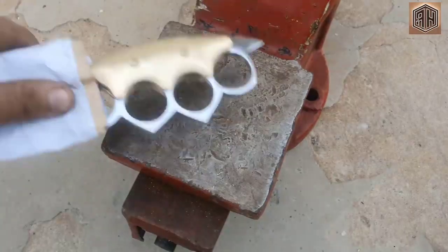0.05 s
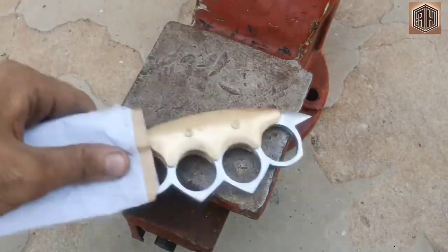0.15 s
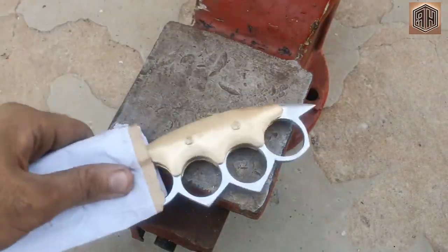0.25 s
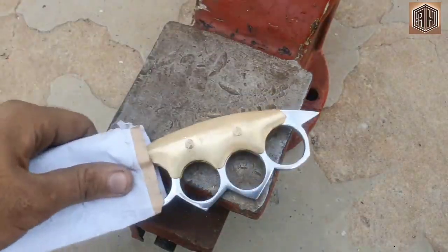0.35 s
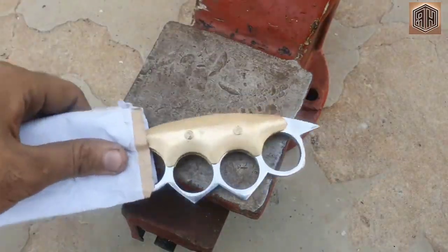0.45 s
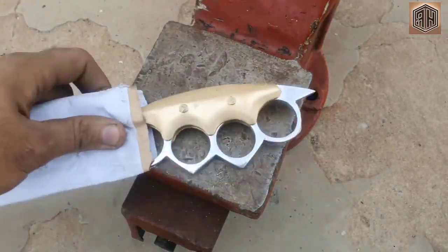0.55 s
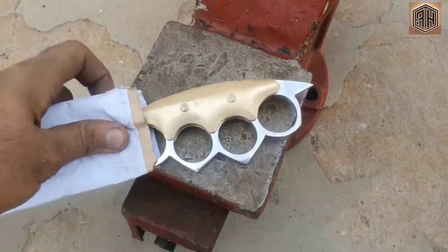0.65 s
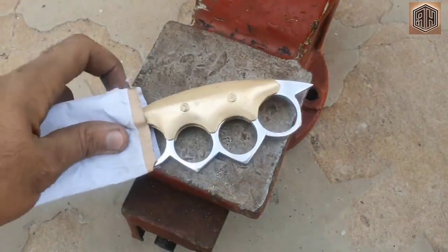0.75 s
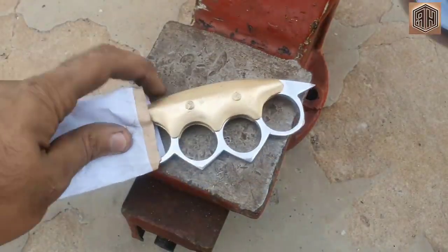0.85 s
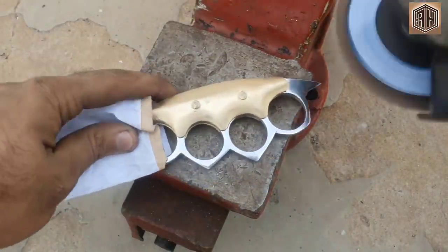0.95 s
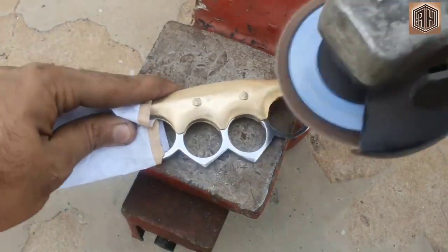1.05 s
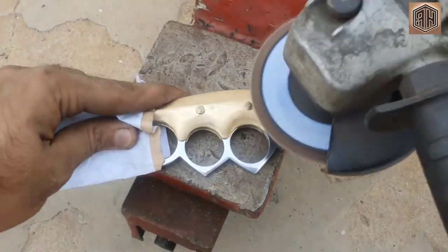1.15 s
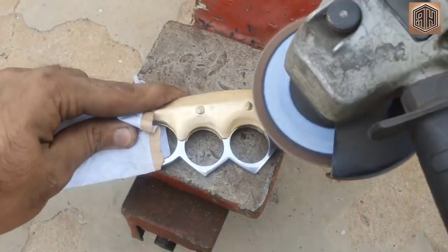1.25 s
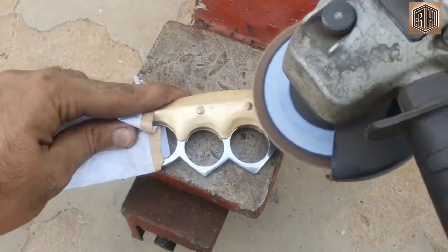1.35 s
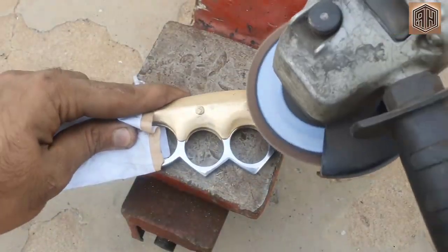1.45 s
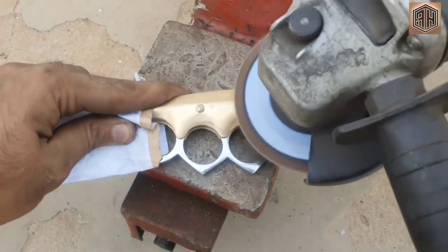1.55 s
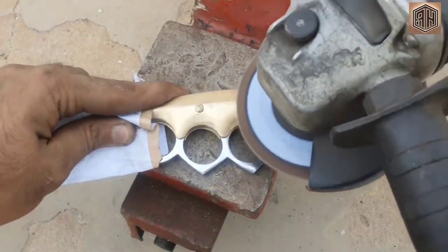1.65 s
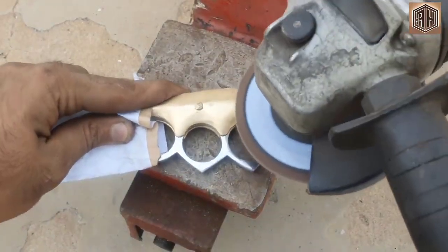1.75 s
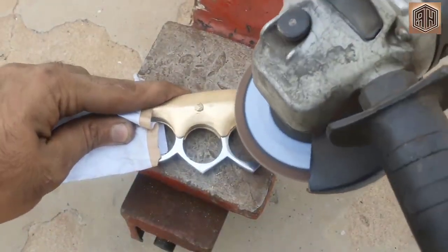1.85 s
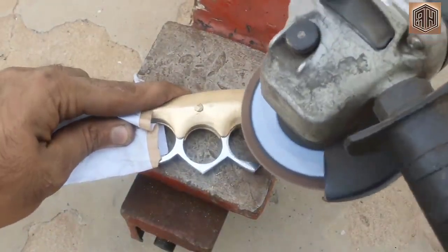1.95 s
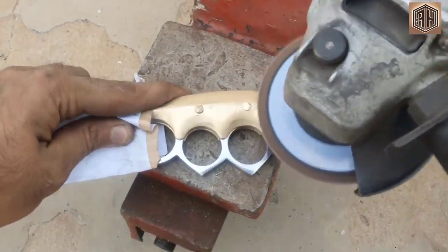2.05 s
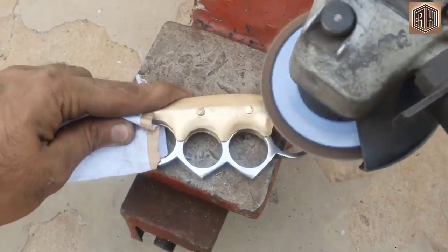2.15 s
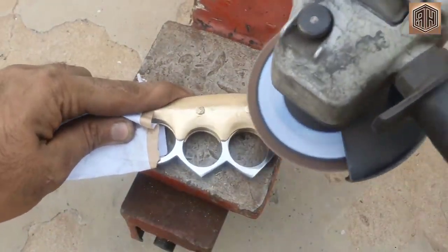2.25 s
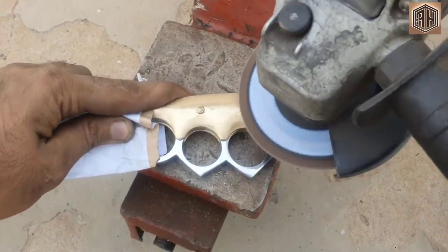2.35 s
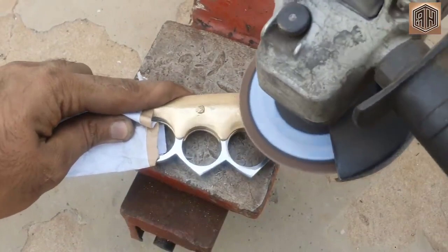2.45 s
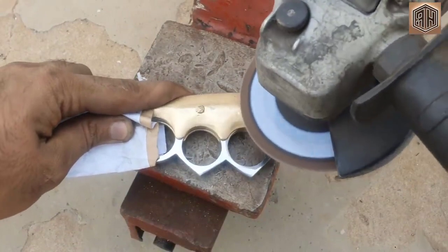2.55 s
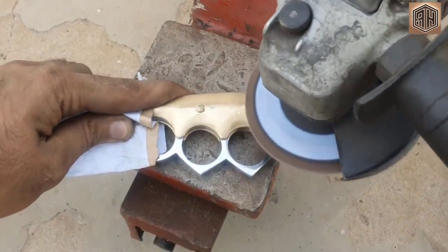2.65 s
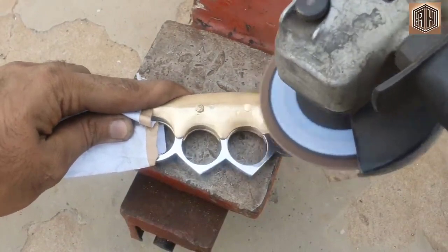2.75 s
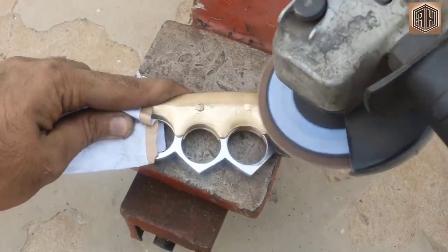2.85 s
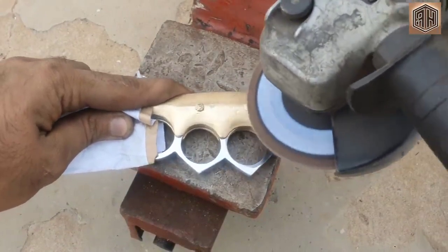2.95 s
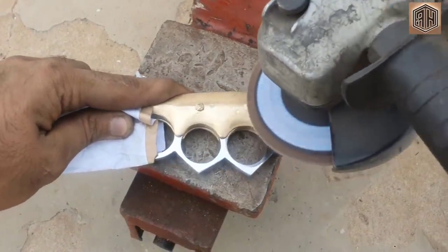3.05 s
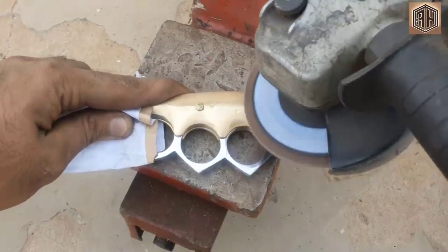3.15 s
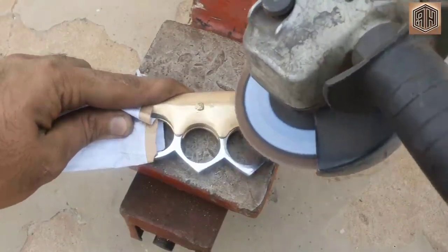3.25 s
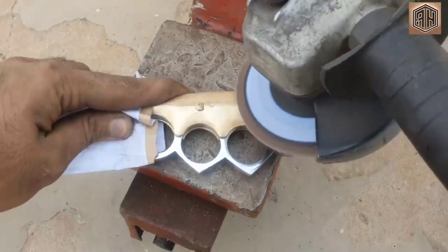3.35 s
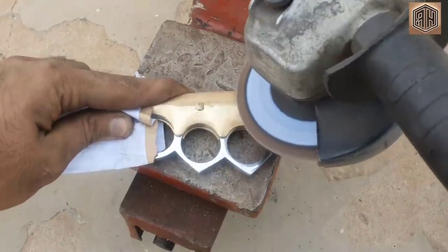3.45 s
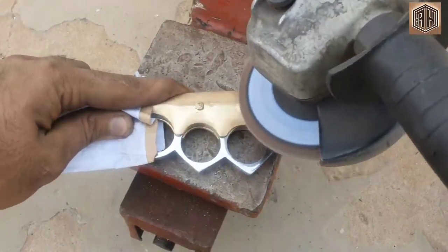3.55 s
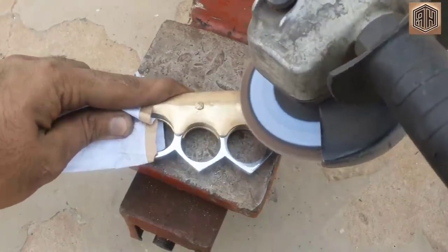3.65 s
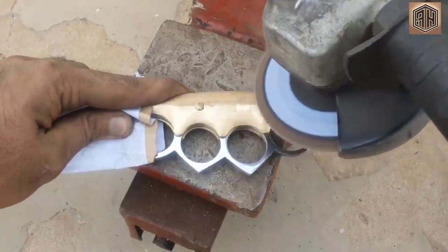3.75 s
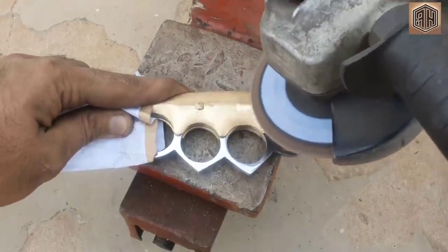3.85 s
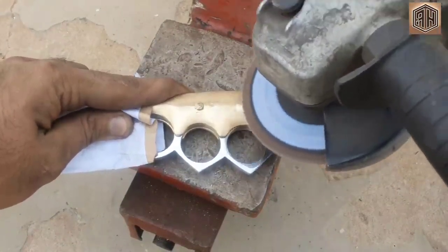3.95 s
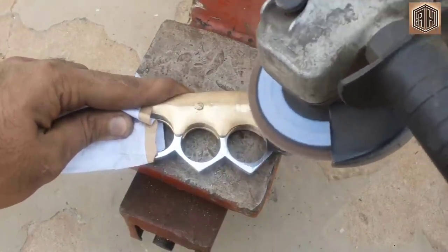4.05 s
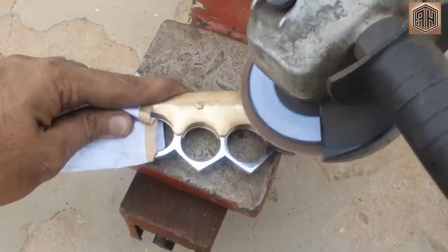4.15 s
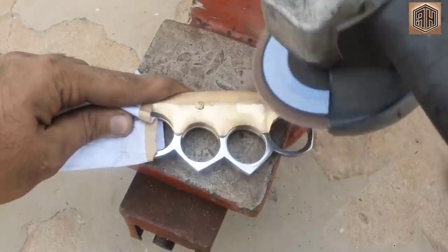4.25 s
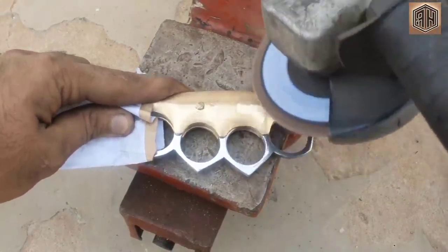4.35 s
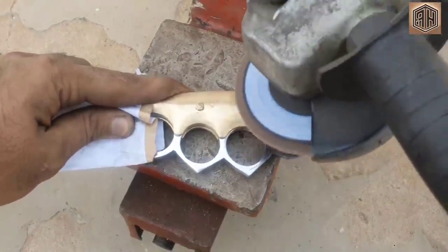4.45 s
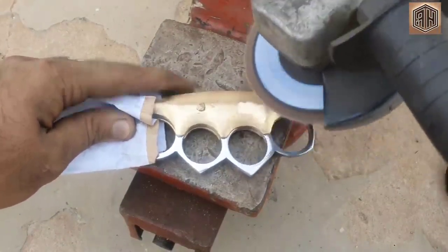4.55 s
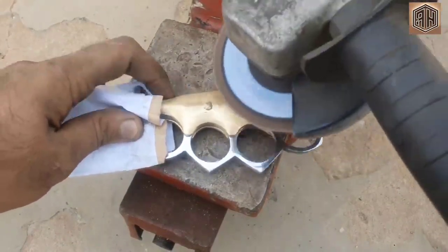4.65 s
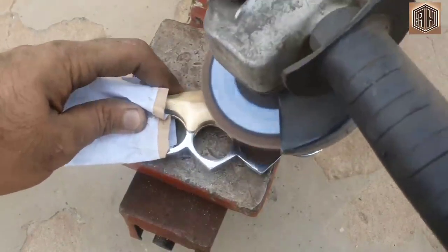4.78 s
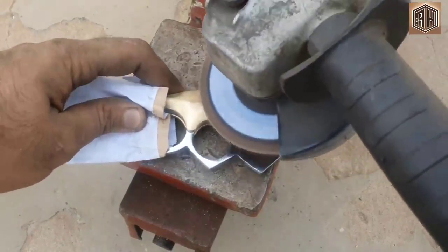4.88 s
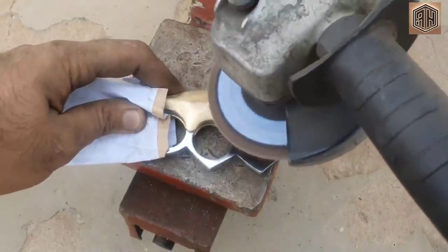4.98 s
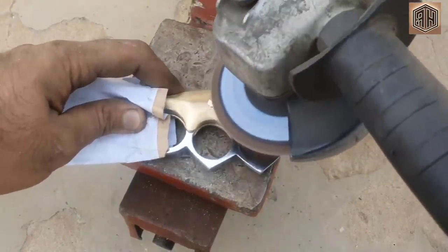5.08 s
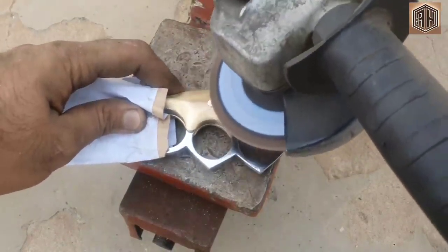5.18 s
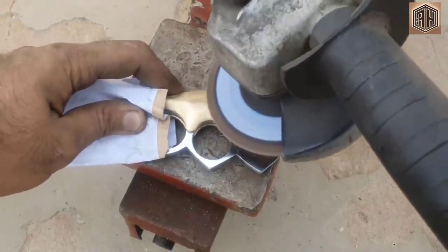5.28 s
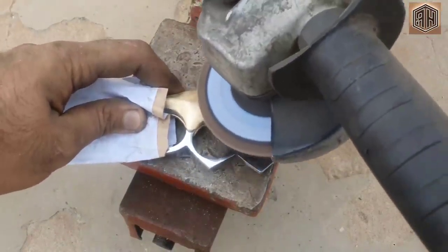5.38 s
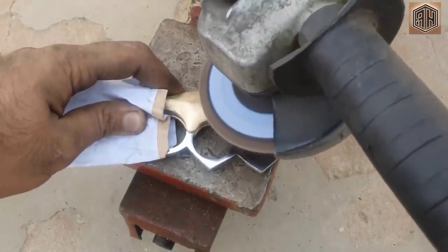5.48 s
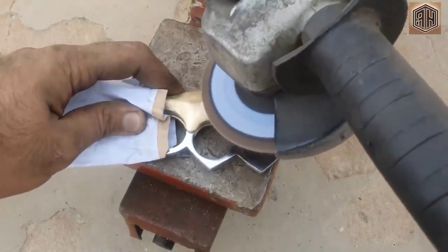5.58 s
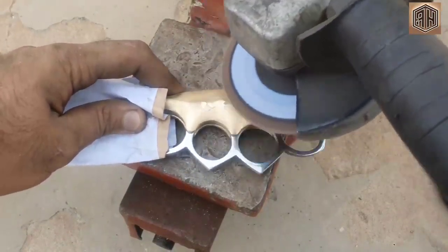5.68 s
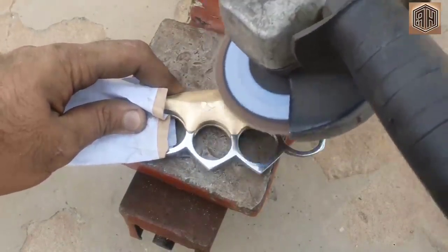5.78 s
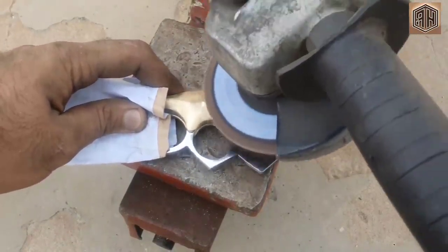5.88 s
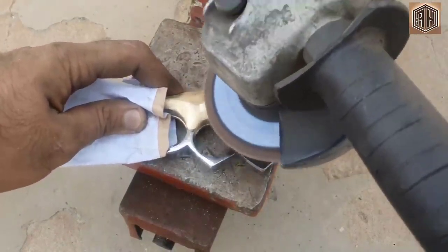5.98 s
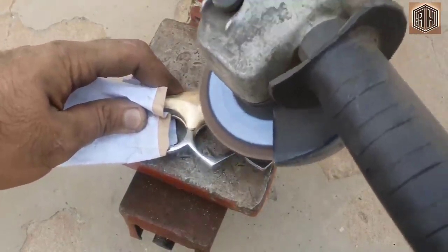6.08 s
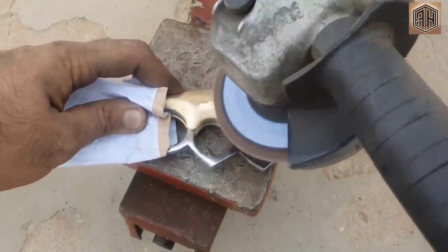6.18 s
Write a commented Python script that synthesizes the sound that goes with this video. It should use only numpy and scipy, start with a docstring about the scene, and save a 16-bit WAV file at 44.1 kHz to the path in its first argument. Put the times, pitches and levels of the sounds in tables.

```python
"""Knife and angle grinder outdoors

A knuckle-guard knife is slid onto a steel block: gritty noise and short ringing ticks.
Then an angle grinder with a polishing disc starts: blows at the pulse of its current ring the housing,
and shaped noise makes its roar. On the metal it slows, whines on shaft orders (sines) and hisses.
A hum of three sines sinks as the tool starts; low noise and decaying sines are air bumping the microphone."""
import sys
import numpy as np
from scipy import signal
from scipy.io import wavfile
from scipy.ndimage import uniform_filter1d

SR = 44100
rng = np.random.default_rng(int(sys.argv[2]) if len(sys.argv) > 2 else 0)


def pcm_store(signal):
    """Save signal as 16-bit PCM."""
    levels = np.round(np.clip(np.atleast_2d(signal), -1, 1) * 32767)
    wavfile.write(sys.argv[1], SR, levels.astype(np.int16).T)


N = 274302  # samples
SWITCH_S = .7445  # the grinder is switched on
PULSE_HZ = 178.3  # pulse of the current, also the pitch of the hum


def amp(db):
    """Decibels to gain."""
    return 10 ** (np.asarray(db) / 20)


def lean(left_db):
    """Gains of the left and right port, left_db apart."""
    return amp(np.array([[.5], [-.5]]) * left_db)


def evened(x):
    """Scales to rms 1."""
    return x / np.sqrt(np.mean(x ** 2) + 1e-20)


def read(points, hz):
    """Reads a table over log frequency."""
    f, value = np.transpose(points)
    return np.interp(np.log(hz + 1), np.log(f + 1), value)


def curves(rows):
    """The columns of a table at every sample."""
    s, *columns = np.transpose(rows)
    return [np.interp(np.arange(N) / SR, s, c) for c in columns]


def while_on(rows):
    """1 from the first to the last row of a table, else 0."""
    t = np.arange(N) / SR
    return (t >= rows[0][0]) & (t <= rows[-1][0])


def drift(per_s):
    """Slow random wander: straight lines between per_s random knots a second."""
    knots = rng.standard_normal(int(N / SR * per_s) + 2)
    return np.interp(np.arange(N) / SR * per_s, np.arange(len(knots)), knots)


def lump(s, rise_s, hold_s, fall_s):
    """Gain that climbs 20 dB in rise_s up to s, holds, and drops 20 dB in fall_s."""
    t = np.arange(N) / SR - s
    return amp(-20 * np.maximum(np.maximum(-t / rise_s, (t - hold_s) / fall_s), 0))


# how alike the two ports hear noise: (frequency [Hz], likeness [0-1])
PORT_LIKENESS = [(60, 0.28), (92, 0.26), (140, 0.6), (210, 0.25), (330, 0.56), (500, 0.87), (770, 0.42),
                 (1170, 0.9), (1790, 0.52), (2740, 0.58), (4190, 0.23), (6410, 0.062), (9810, 0.011),
                 (15000, 0.00017)]
# which port hears noise louder: (frequency [Hz], left minus right [dB])
PORT_LEAN = [(60, 10), (92, 4), (140, 0), (210, 15), (330, 7), (500, -1.5), (770, -3.5), (1170, 1.5),
             (1790, 2), (2740, -3.5), (4190, 0.5), (6410, -1.5), (9810, 0), (15000, 4.5)]


def noise(spectrum, patchy_db, likeness=PORT_LIKENESS, port_lean=PORT_LEAN, size=512):
    """Two-port noise from random short-time spectra with drifting patches; its mid has rms 1."""
    hz = np.fft.rfftfreq(size, 1 / SR)
    a, b, c, d, patches = rng.standard_normal((N * 4 // size + 5, len(hz), 5)).T
    patches = uniform_filter1d(patches, size=6, axis=0)
    patches = evened(uniform_filter1d(patches, size=16, axis=1))
    like = np.clip(read(likeness, hz), -1, 1)[:, None]
    half_lean = amp(read(port_lean, hz) / 2)[:, None]
    left = a + 1j * b
    right = like * left + np.sqrt(1 - like ** 2) * (c + 1j * d)
    ports = np.array([left * half_lean, right / half_lean])
    ports *= amp(read(spectrum, hz)[:, None] + patchy_db * patches)
    out = signal.istft(ports, nperseg=size, noverlap=size * 3 // 4)[1][:, :N]
    return out / np.sqrt(np.mean(out.mean(0) ** 2))


def tone(turns, db, left_db, lag):
    """A sine of wavering level, set midway between the ports; the right port lags by lag radians."""
    ports = lean(left_db) * np.exp(-1j * np.array([[0], [lag]]))
    ports = ports / max(abs(ports.mean()), .5)
    wave = np.exp(2j * np.pi * (turns + rng.random())) * ports
    return np.sqrt(2) * amp(db + 1.2 * drift(15)) * wave.real


def resonate(x, hz, width_hz):
    """Rings x at a gliding pitch: shifts the curve hz down to zero, smooths, and shifts back."""
    turn = np.exp(2j * np.pi * np.cumsum(hz) / SR)
    r = np.exp(-np.pi * width_hz / SR)
    return 2 * (turn * signal.lfilter([1 - r], [1, -r], x / turn)).real


# colour of the scraping: (frequency [Hz], relative density [dB per Hz])
SCRAPE_COLOUR = [(290, -45), (500, -18), (1170, -1), (1880, -7.5), (2240, -3), (2990, -10.5), (3820, -18),
                 (4170, -19), (5480, -17), (6610, -17.5), (15700, -32.5)]
# knife and cloth slide over the block:
# (start [s], hold [s], time to fall 20 dB [s], level [dB], brightness [dB])
SLIDES = [(.105, .04, .08, -35, -1.5), (.17, .022, .015, -40, 1.5), (.222, .01, .035, -39, -1.5),
          (.27, .05, .04, -57, 4), (.328, .003, .02, -40, -16), (.495, .015, .03, -55, 3),
          (.532, .012, .03, -38, 2), (.59, .05, .03, -41, -7), (.66, .018, .045, -36, 5.5),
          (.72, .03, .03, -47, 1.5)]
# the knife ticks on the block: (time [s], level [dB], ring [Hz])
TICKS = [(0.085, -26, 985), (0.179, -28, 1130), (0.215, -13, 2200), (0.236, -18, 2300), (0.297, -22, 5270),
         (0.326, -22, 1340), (0.425, -36, 7240), (0.481, -28, 1040), (0.583, -23, 2370),
         (0.622, -22.5, 1480), (0.659, -22, 5610)]
SLIDE_RISE_S = .025  # time to climb 20 dB
REST_DB, REST_BRIGHT_DB = -68, -.5  # grit between slides
TICK_T60_S = .017


def handling():
    """Gritty sliding as two bands of noise, and small metal ticks as short sines with noise."""
    grit = noise(SCRAPE_COLOUR, 3.2, [(500, 0.25), (15000, 0.1)], [(500, -0.1), (15000, -0.43)], size=256)
    grit = grit * amp(2.0 * drift(300))
    dull = signal.sosfilt(signal.butter(4, 4000, fs=SR, output="sos"), grit)
    bright = signal.sosfilt(signal.butter(4, 4000, "high", fs=SR, output="sos"), grit)
    dull_gain = amp(REST_DB)
    bright_gain = amp(REST_DB + REST_BRIGHT_DB)
    for s, hold_s, fall_s, db, bright_db in SLIDES:
        slide = amp(db) * lump(s, SLIDE_RISE_S, hold_s, fall_s)
        dull_gain = dull_gain + slide
        bright_gain = bright_gain + slide * amp(bright_db)
    out = evened(dull) * dull_gain + evened(bright) * bright_gain
    out *= np.arange(N) < SWITCH_S * SR
    t = np.arange(2000) / SR
    for s, db, hz in TICKS:
        ring = 0.37 * np.sin(2 * np.pi * hz * t) + 0.3 * rng.standard_normal((2, len(t)))
        tick = amp(db - 60 * t / TICK_T60_S) * ring * np.minimum(t / .0007, 1)
        out[:, round(s * SR):][:, :len(t)] += tick
    return out


# the hum before its overtone levels: (time [s], level [dB])
HUM_LEVEL = [(0.0, -40), (0.1, -55.5), (0.24, -40), (0.71, -38.5), (0.84, -72), (1.54, -67), (2.3, -71),
             (3.3, -63), (3.8, -70), (6.22, -73)]
# (multiple of the pulse [ratio], level against the hum [dB])
HUM_OVERTONES = [(1, -2.5), (2, -14), (3, -18)]


def hum():
    """A drone of steady pitch, sines on multiples of the pulse, that sinks once the tool is loud."""
    turns = np.arange(N) / SR * PULSE_HZ
    level_db, = curves(HUM_LEVEL)
    return sum(tone(k * turns, level_db + db, -4, .2) for k, db in HUM_OVERTONES)


# colour of the thuds: (frequency [Hz], relative density [dB per Hz])
THUD_COLOUR = [(15, -53), (25, -34), (92, 0), (156, -6.5), (188, -4), (227, -14), (300, -16), (390, -46),
               (660, -120)]
# colour of the rustle: (frequency [Hz], relative density [dB per Hz])
RUSTLE_COLOUR = [(100, -40), (180, -5), (250, -1.5), (480, 2), (800, -3), (1200, -28)]
# gusts on the microphone: (time [s], hold [s], thud level [dB], rustle level [dB])
GUSTS = [(.001, .002, -41, -55), (.17, .02, -39, -47), (.25, .04, -35, -48), (.34, .02, -39, -42),
         (.445, .015, -35, -46), (.51, .09, -46, -44), (.62, .05, -41, -44), (1.16, .02, -66, -62),
         (1.33, .1, -68, -57), (2.34, .3, -67, -56), (2.96, .025, -48, -48), (3.05, .005, -40.5, -39),
         (3.23, .045, -39, -38), (3.31, .005, -36, -44), (3.36, .025, -36, -40), (3.44, .02, -42, -40),
         (3.57, .015, -44.5, -47), (4.02, .005, -52, -49), (4.19, .005, -50, -57),
         (4.395, .03, -40.5, -32.5), (4.45, .07, -54, -37), (4.635, .015, -40.5, -50),
         (4.88, .005, -61, -56), (5.11, .005, -54, -61), (6.03, .01, -45, -51), (6.12, .005, -43, -55)]
# air between gusts: (time [s], thud level [dB], rustle level [dB])
CALM = [(0.0, -62, -57), (.3, -52, -50), (.72, -52, -50), (.81, -75, -68), (1.5, -75, -57), (2.0, -80, -63),
        (4.6, -76, -57), (5.2, -83, -76), (6.22, -76, -66)]
# single puffs that bump the microphone: (time [s], level [dB], pitch [Hz])
BUMPS = [(2.966, -37, 299), (3.037, -33, 137), (3.229, -32, 145), (3.353, -25, 129), (3.558, -33, 148),
         (3.886, -43, 296), (3.98, -36, 273), (4.17, -42, 161), (4.37, -44, 266), (4.39, -32, 157),
         (4.627, -36, 176), (5.086, -47, 127), (5.458, -49, 288), (6.022, -31, 96.9), (6.104, -37, 113)]
GUST_RISE_S, GUST_FALL_S = .035, .04  # time for 20 dB
BUMP_T60_S = .072


def wind():
    """Lumpy low buffeting and single decaying thumps, louder at the right port."""
    gusts = np.array([lump(s, GUST_RISE_S, hold_s, GUST_FALL_S) for s, hold_s, *_ in GUSTS])
    gust_power = amp(np.transpose(GUSTS)[2:]) ** 2 @ gusts ** 2
    thud_gain, rustle_gain = np.sqrt(amp(curves(CALM)) ** 2 + gust_power)
    thud = noise(THUD_COLOUR, 4.4, [(60, .4), (200, 0.92)], [(60, -10), (200, -16.0)], size=2048)
    rustle = noise(RUSTLE_COLOUR, 2.9, [(200, 1.0), (800, 0.52)], [(200, -5), (800, -0.5)], size=1024)
    out = amp(2.2 * drift(50)) * (thud_gain * thud + rustle_gain * rustle)
    t = np.arange(4000) / SR
    port_db = np.array([[-4], [2.5]])
    for s, db, hz in BUMPS:
        envelope = amp(db - 60 * t / BUMP_T60_S + port_db) * (1 - np.exp(-t / 0.0045))
        bump = envelope * np.sin(2 * np.pi * hz * t)
        part = out[:, round(s * SR):][:, :len(t)]
        part += bump[:, :part.shape[1]]
    return out


# clacks, before CLACK_DB: (time [s], level [dB], ring [Hz])
CLACKS = [(.744, -26, 6560), (.79, -22, 6840), (.8, -21, 5030), (.83, -13, 6150), (.865, -22, 6850),
          (.94, -16, 6650), (1.04, -21, 6830), (1.12, -17.5, 7220), (1.3, -22.5, 7400), (1.65, -20, 7500),
          (2.1, -21.5, 7250), (2.34, -26, 7250), (2.75, -18, 7100), (3.0, -22, 7000), (3.75, -18, 6880),
          (4.0, -20, 7100), (4.2, -18.5, 7150), (4.35, -22, 7050), (4.7, -20, 6800), (5.05, -18.5, 6950),
          (5.3, -23, 6800), (5.7, -18, 6800), (5.88, -22, 6950), (6.0, -17, 7050), (6.22, -17.5, 7050)]
# the housing rings low under the first hard clacks, before START_DB: (time [s], level [dB], ring [Hz])
START_RING = [(0.744, -17, 3550), (0.748, -23, 3460), (0.794, -15, 3620), (0.85, -35, 3780)]
CLACK_DB, START_DB = -4, -.6  # trims
CLACK_WIDTH_HZ, START_WIDTH_HZ = 1400, 800  # of each of three resonators in a row
CLACK_JITTER_S, CLACK_SPREAD_DB = .0007, 4.5  # scales of the random lateness and size


def clacks():
    """Each pulse of current knocks the gear: one sharp blow of uneven size rings the housing."""
    size, late, sign, *ports = rng.standard_normal((int(N / SR * PULSE_HZ), 5)).T
    at_s = np.arange(len(size)) / PULSE_HZ + abs(CLACK_JITTER_S * late)
    at = np.round(at_s * SR).astype(int)
    size = amp(CLACK_SPREAD_DB * np.clip(size, -3, 1.2)) * np.sign(sign)
    blows = np.zeros((2, N))
    for port, chance in zip(blows, ports):  # each port hears the blow a few samples apart
        delay = np.round(1.2 * abs(chance)).astype(int)
        port[np.minimum(at + delay, N - 1)] = size
    blows = evened(blows) + 0.5 * rng.standard_normal((2, N))  # loose teeth chatter between blows
    out = 0
    for rows, trim_db, width_hz, left_db in ((CLACKS, CLACK_DB, CLACK_WIDTH_HZ, -8),
                                             (START_RING, START_DB, START_WIDTH_HZ, -4)):
        level_db, hz = curves(rows)
        ring = blows
        for _ in range(3):  # three in a row: the ring swells, then dies
            ring = resonate(ring, hz, width_hz)
        gain = amp(level_db + trim_db + 1.3 * drift(25)) * lean(left_db)
        out = out + evened(ring) * gain * while_on(rows)
    return out


# shaft speed sags under the disc and runs up again in between;
# tables that follow on from each other: (time [s], speed [turns per s])
SAG = [
    [(1.3, 258.0), (1.58, 258.5), (1.66, 255.1), (1.74, 248.5), (1.9, 233.5), (1.98, 227.5), (2.06, 222.8),
     (2.13, 221.5)],
    [(2.4, 250.0), (2.525, 243.2), (2.675, 231.2), (2.75, 224.2), (2.81, 222.5)],
    [(3.0, 243.1), (3.08, 243.9), (3.16, 239.9), (3.32, 228.9), (3.4, 226.5), (3.64, 219.3), (3.72, 215.8),
     (3.785, 215.0)],
    [(3.95, 237.1), (4.06, 240.8), (4.17, 238.3), (4.28, 238.1), (4.5, 250.2)],
    [(4.96, 252.9), (5.104, 232.0), (5.176, 223.6), (5.248, 219.2), (5.392, 213.6), (5.464, 211.5),
     (5.536, 211.1), (5.608, 209.6), (5.68, 205.4), (5.75, 205.2)],
    [(5.93, 235.6), (6.0, 238.6), (6.07, 234.8), (6.22, 230.3)],
]


def shaft_speed():
    """Turns per second of the shaft, which slows under load."""
    return curves(sum(SAG, []))[0]


# the disc on the metal, whine levels before the trim: (touch [s], lift [s], rubbing [dB],
# order 32 [dB], order 31 [dB], their neighbours [dB], low orders [dB], high orders [dB])
STROKES = [(1.5, 2.115, 4.5, -24, -27, -32, -45.5, -35), (2.33, 2.795, 5.5, -24.5, -26, -31, -45, -33),
           (2.95, 3.77, 5.5, -21, -25, -28, -47.5, -34), (3.93, 4.26, 4, -24, -28, -34, -50, -41),
           (4.38, 4.53, 6, -36, -38, -44, -55, -46), (4.82, 5.735, 6, -17, -25, -28, -46, -35),
           (5.85, 6.4, 5, -22, -24, -30, -45, -35)]
PRESS_S, LIFT_S = .21, .04  # leaning in, letting go


def strokes():
    """Contact 0-1 of the disc, and the level columns of the stroke in hand."""
    t = np.arange(N) / SR
    in_hand = np.maximum(np.searchsorted([row[0] for row in STROKES], t) - 1, 0)
    touch, lift, *levels = np.array(STROKES).T[:, in_hand]
    contact = np.clip((t - touch) / PRESS_S, 0, 1) * np.clip(1 - (t - lift) / LIFT_S, 0, 1)
    return contact, levels


# colours of body, fizz and low roar: (frequency [Hz], relative density [dB per Hz])
BODY_COLOUR = [(530, -47.5), (900, -22), (1350, -17.5), (1510, -12), (2160, -12.5), (2380, -8), (2730, -9),
               (3180, -3), (3530, -5), (3950, -8.5), (4830, -2.7), (5550, -6.2), (7070, -2), (8330, -13),
               (9000, -11.5), (11700, -17.5), (19800, -120)]
FIZZ_COLOUR = [(4590, -40), (7800, -2), (8720, -3), (10400, -3), (12800, -6.5), (13800, -4.5),
               (15000, -5.5), (15700, -10)]
LOW_COLOUR = [(120, -57), (200, -40), (485, -35), (528, -13), (576, -17.5), (746, -6), (914, -16.5),
              (1300, -8), (1690, -79), (2860, -120)]
# air and disc noise, one row each for lower body, upper body, fizz, low roar:
# (free-running level [dB], slope [dB per lost turn per s], share of the rubbing [ratio],
# offset at the start of the run-up [dB], run-up time constant [s], jolt at the switch [dB])
LAYERS = [(-27, -.23, .3, -24, .16, 29), (-19.3, -.17, .6, -8, .3, 5), (-24.8, -.16, 1.05, .6, .3, 1.5),
          (-39.8, -.15, -.3, -22, .26, 27)]
# uneven rise and fall in the level of the whole roar: (time [s], level [dB])
SWELL = [(.75, .1), (1.0, -.1), (1.5, .1), (1.75, -.7), (2.0, .1), (2.18, .8), (2.45, -1.2), (2.65, .9),
         (2.9, -.5), (3.15, -1.4), (3.7, -.9), (3.82, -.6), (3.9, .6), (3.98, -1.8), (4.22, -1.1),
         (4.33, -2.5), (4.5, -.3), (4.66, -1.2), (4.8, .6), (4.96, .2), (5.08, -1.2), (5.2, -.6),
         (5.36, -1.9), (5.5, 1.2), (5.72, 1.4), (5.9, -1.2), (6.22, .4)]
FREE_TURNS_PER_S, JOLT_S = 258, .02
LEAN_OFF_DB, LEAN_ON_DB = -1.8, -.7  # left minus right, off and on the metal
LEAN_START_DB, LEAN_S = -4, .2  # extra lean at the switch and its time constant


def roar():
    """Fan air follows the shaft speed; the disc adds its rubbing while it touches the metal."""
    since = np.maximum(np.arange(N) / SR - SWITCH_S, 0)
    lost_turns = FREE_TURNS_PER_S - shaft_speed()
    swell_db, = curves(SWELL)
    contact, (rub_db, *_) = strokes()
    levels = []
    for db, slope, share, offset_db, up_s, jolt_db in LAYERS:
        running_db = db + slope * lost_turns + share * rub_db * contact + swell_db
        starting_db = offset_db * np.exp(-since / up_s) + jolt_db * np.exp(-(since / JOLT_S) ** 2)
        levels.append(running_db + starting_db)
    lower_db, upper_db, fizz_db, low_db = levels
    left_db = LEAN_OFF_DB + (LEAN_ON_DB - LEAN_OFF_DB) * contact + LEAN_START_DB * np.exp(-since / LEAN_S)
    flutter_db = 0.72 * drift(120) + .7 * drift(14)
    body = noise(BODY_COLOUR, 1.12)
    lower = signal.sosfiltfilt(signal.butter(2, 2700, fs=SR, output="sos"), body)
    upper = body - lower
    out = (evened(lower) * amp(lower_db) + evened(upper) * amp(upper_db)) * amp(flutter_db)
    out += noise(FIZZ_COLOUR, 2.4) * amp(fizz_db + flutter_db)
    out += noise(LOW_COLOUR, 1.4, size=1024) * amp(low_db + 2.5 * drift(12))
    return out * lean(left_db) * (since > 0)


# how the whine reaches the ports: (frequency [Hz], left minus right [dB], lag of the right [radians])
WHINE_PORTS = [(766, -8, -1), (1330, -2.5, -1.9), (2480, 6, -0.7), (6900, -12, 0.64), (14800, 6, -1.5)]
# the gear housing favours some pitches of the whine: (frequency [Hz], gain [dB])
HOUSING = [(640, -14), (720, -4.5), (850, -2.5), (900, -13), (1250, -8), (1400, -.5), (1650, -1.5),
           (2150, -8), (2340, 6), (2520, -1.5), (3100, 2.5), (6000, -10), (6250, -4), (6550, -6), (6950, 0),
           (7450, -4.5), (7900, -8), (8150, -16), (12500, -14), (13800, -9), (15100, -6.5), (16500, -11)]
# low orders, whose ninths belong to the gear: (multiple of the shaft speed [ratio])
LOW_ORDERS = (3, 32 / 9, 4, 6, 64 / 9, 10, 11, 14)
# neighbours of orders 31 and 32: (multiple of the shaft speed [ratio])
NEAR_ORDERS = (29, 30, 33, 34, 320 / 9, 36)
# one for each neighbour, against their level in the stroke: (level [dB])
NEAR_ORDER_DB = (-4, -4, -4, -4, -8, -8)
HIGH_ORDERS = range(60, 76)
WHINE_DB, IDLE_DB = 1.5, -18  # overall trim; drop while off the metal


def whine():
    """Sines on multiples of the shaft speed, which sags under load."""
    speed = shaft_speed()
    turns = np.cumsum(speed) / SR
    contact, (_, main_db, under_db, near_db, low_db, high_db) = strokes()
    lines = [(32, main_db), (31, under_db)]
    lines += [(k, near_db + db) for k, db in zip(NEAR_ORDERS, NEAR_ORDER_DB)]
    lines += [(k, low_db + 1.5 * drift(3)) for k in LOW_ORDERS]
    lines += [(k, high_db + 4.5 * drift(7)) for k in HIGH_ORDERS]
    hz, left_db, lag = np.transpose(WHINE_PORTS)
    out = 0
    for k, db in lines:
        at = np.log(k * speed.mean())
        line_left_db = np.interp(at, np.log(hz), left_db)
        line_lag = np.interp(at, np.log(hz), lag)
        out = out + tone(k * turns, db + read(HOUSING, k * speed), line_left_db, line_lag)
    return out * amp(IDLE_DB * (1 - contact) + WHINE_DB) * while_on(sum(SAG, []))


def scene():
    """All sources at the two ports."""
    return handling() + hum() + wind() + clacks() + roar() + whine()


CEILING = .97  # soft limit of the microphone, full scale 1
EDGE_HZ = 15660  # band limit


def record(dry):
    """The microphone drops the lowest bass and overloads softly on loud peaks; then the band limit."""
    thin = signal.sosfilt(signal.butter(2, 70, "high", fs=SR, output="sos"), dry)
    soft = CEILING * np.tanh(thin / CEILING)
    low_pass = signal.firwin(511, EDGE_HZ, window=("kaiser", 9), fs=SR)
    return signal.oaconvolve(soft, low_pass[None], "same")


dry = scene()
out = record(dry)
pcm_store(out)
```